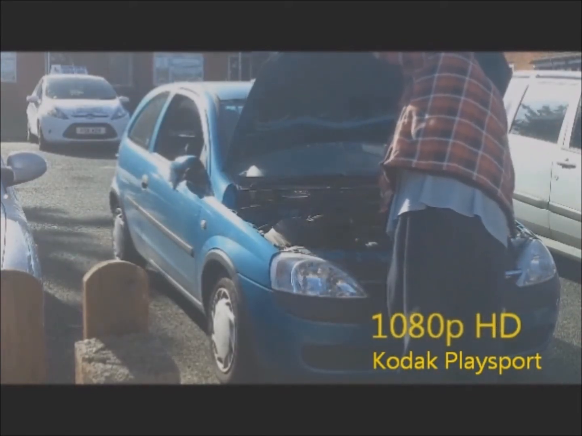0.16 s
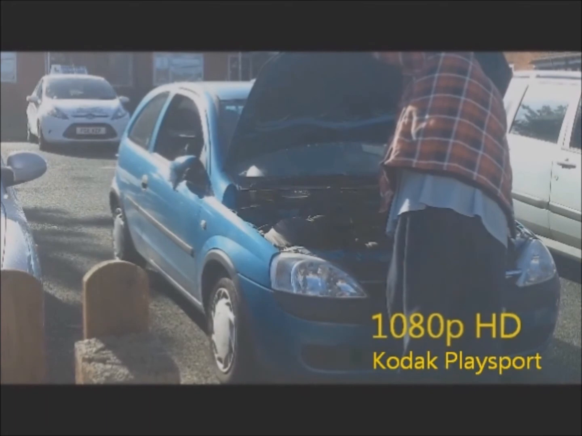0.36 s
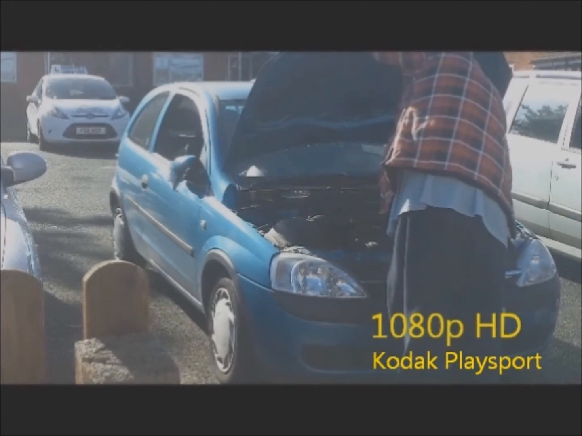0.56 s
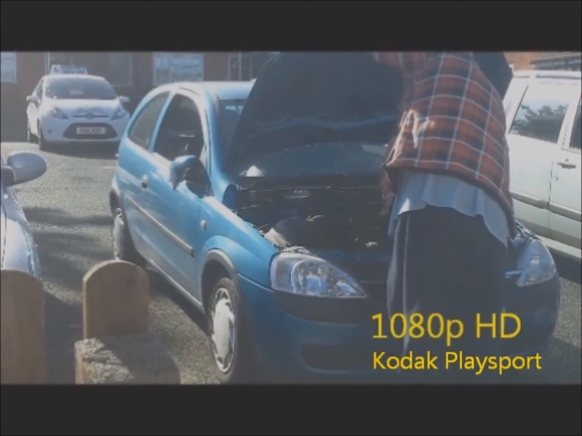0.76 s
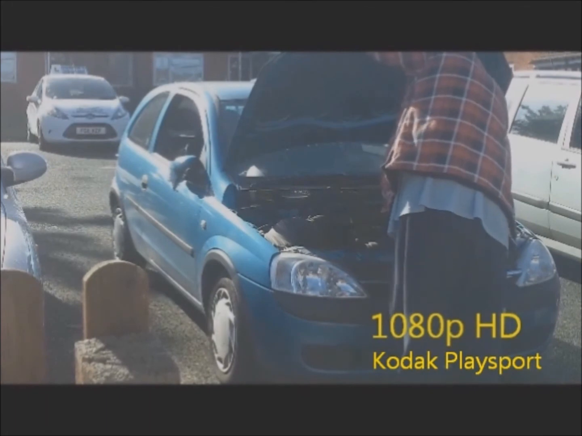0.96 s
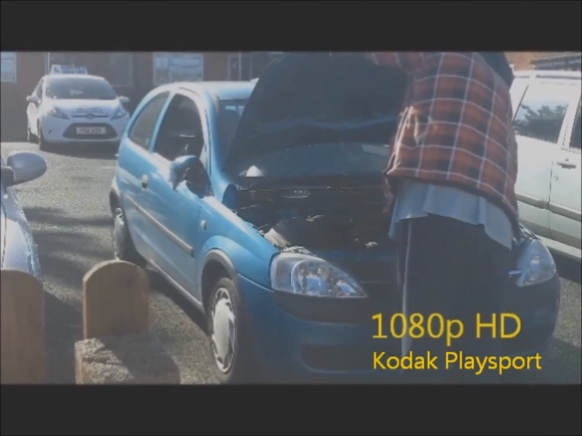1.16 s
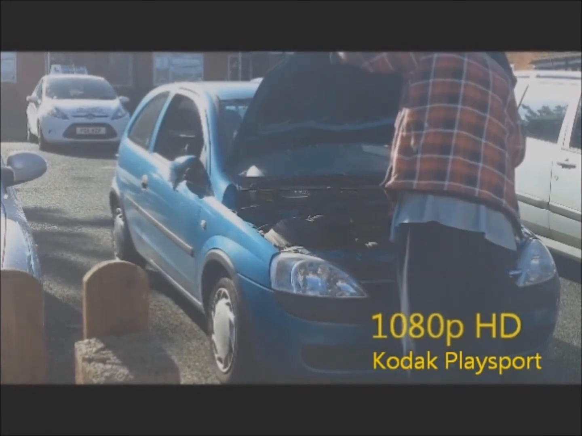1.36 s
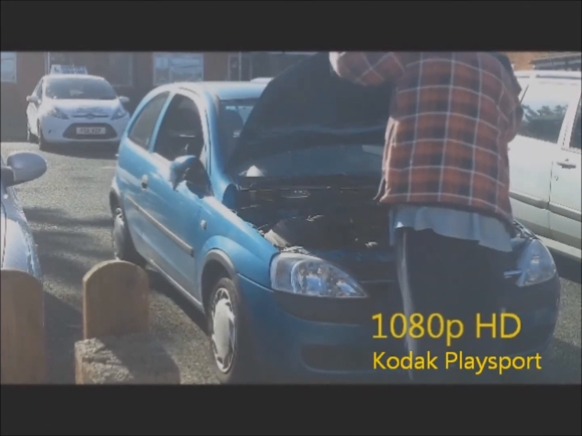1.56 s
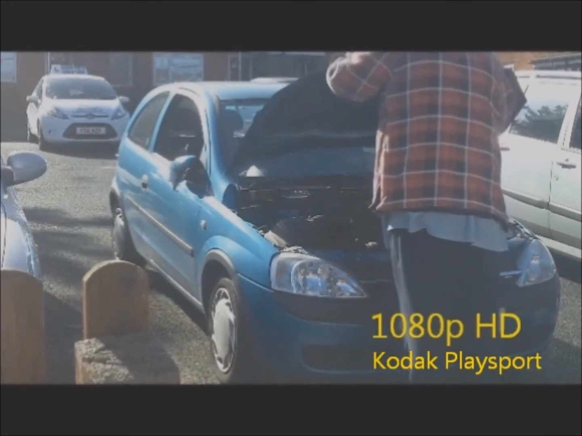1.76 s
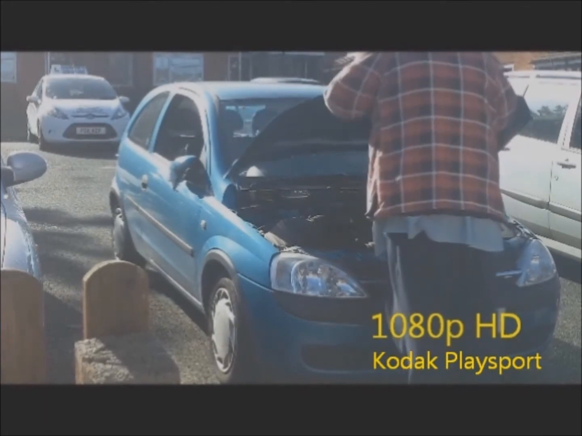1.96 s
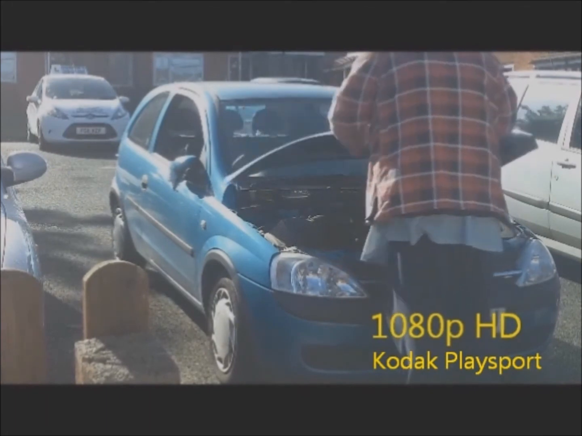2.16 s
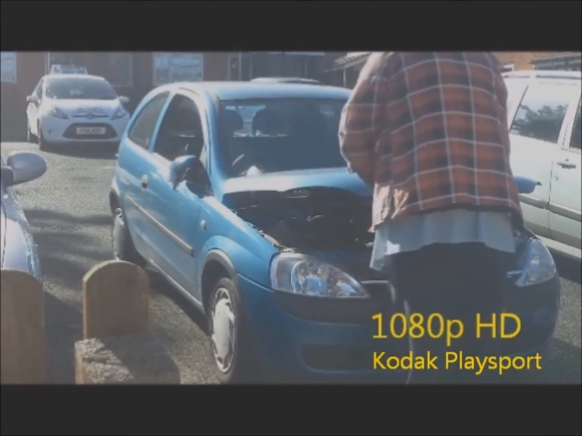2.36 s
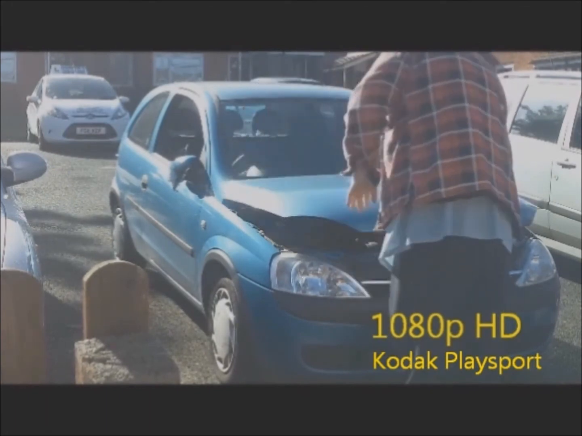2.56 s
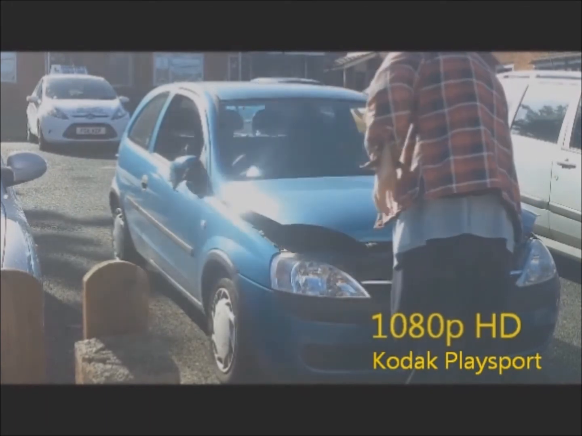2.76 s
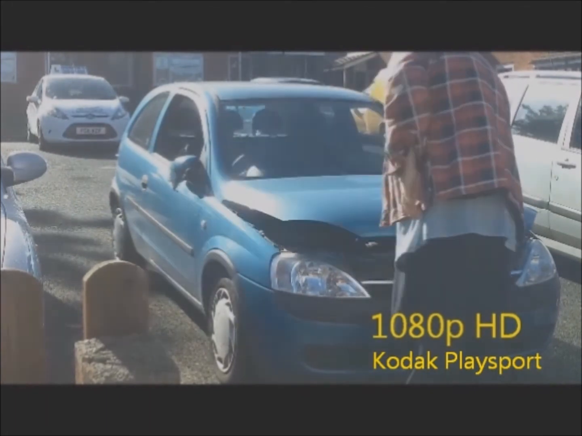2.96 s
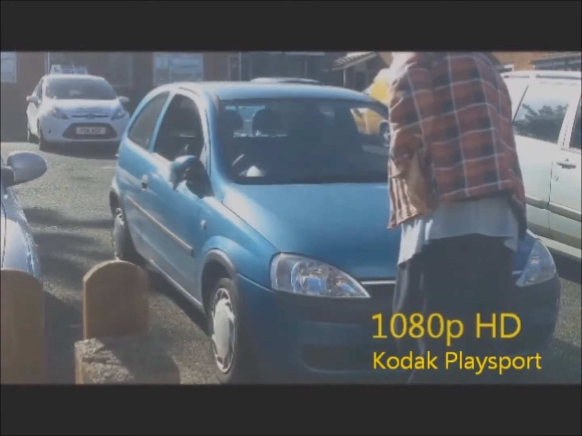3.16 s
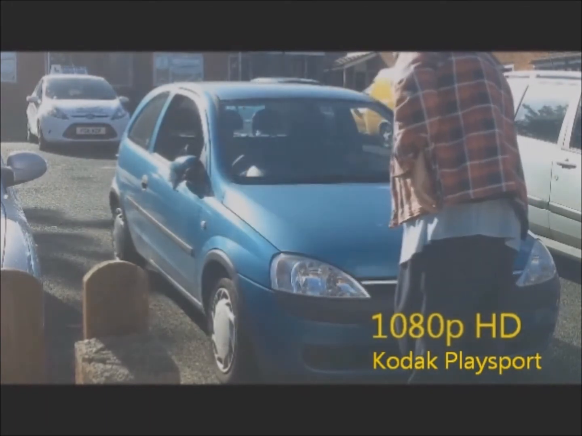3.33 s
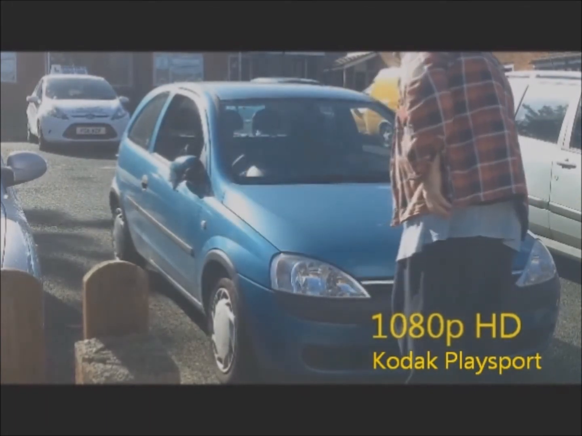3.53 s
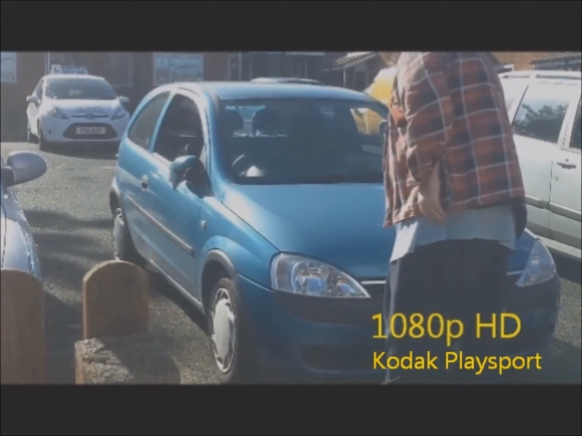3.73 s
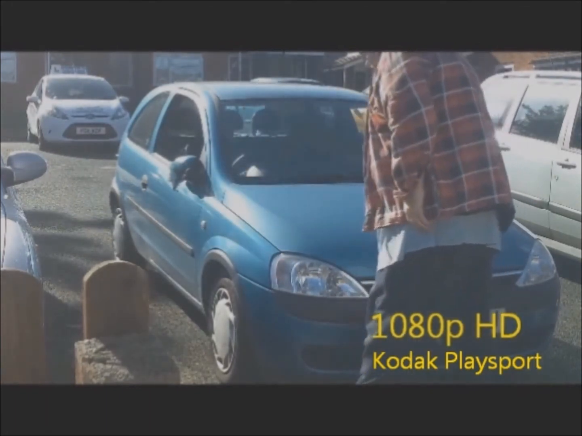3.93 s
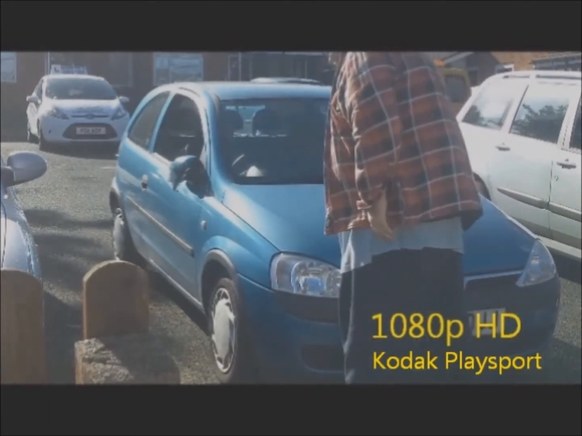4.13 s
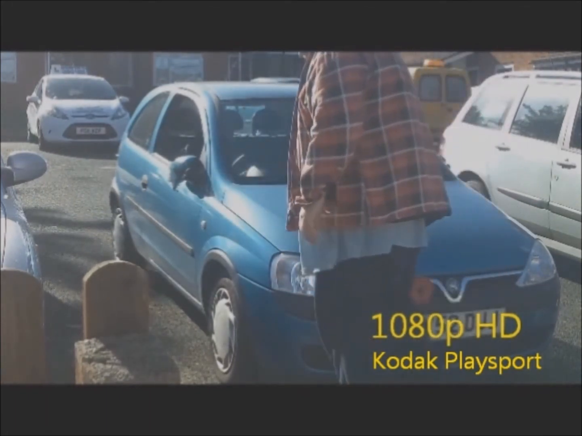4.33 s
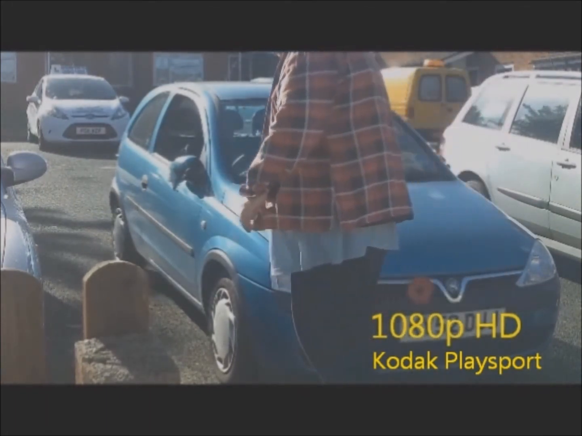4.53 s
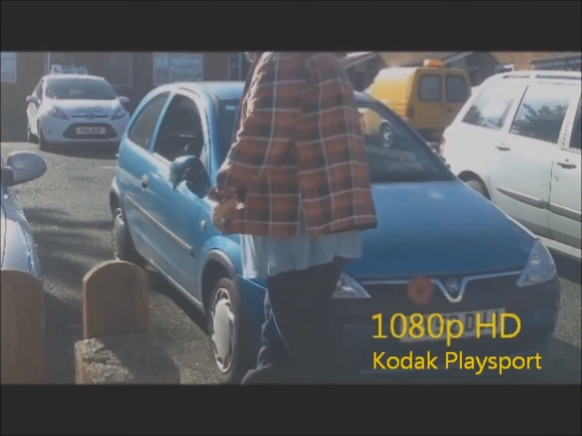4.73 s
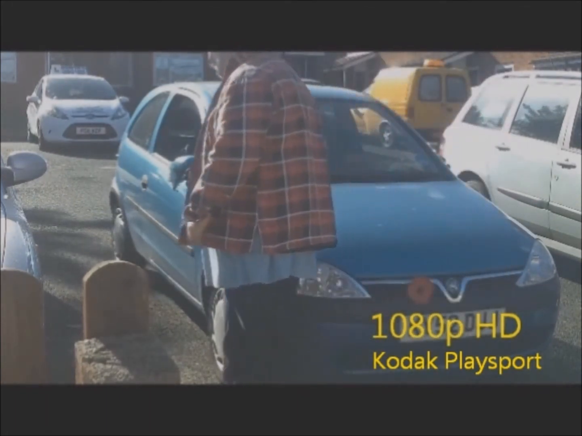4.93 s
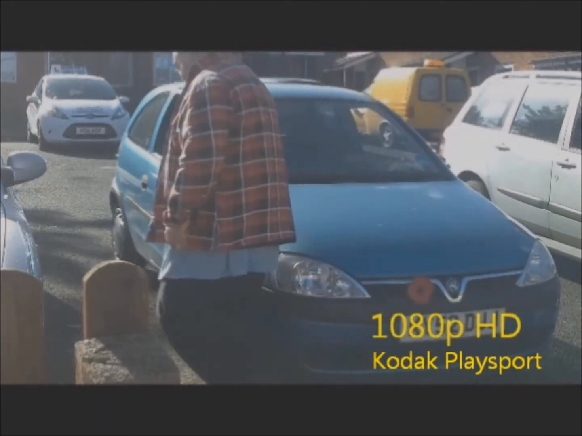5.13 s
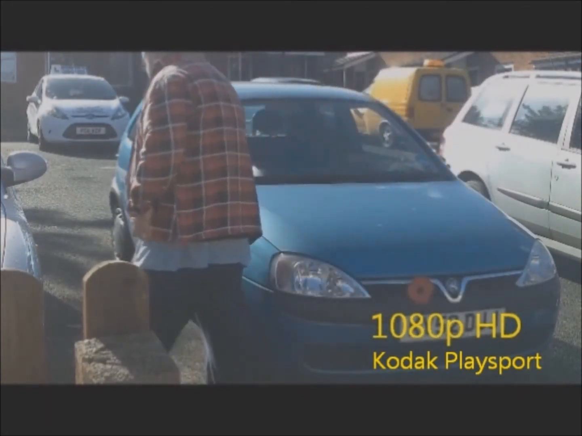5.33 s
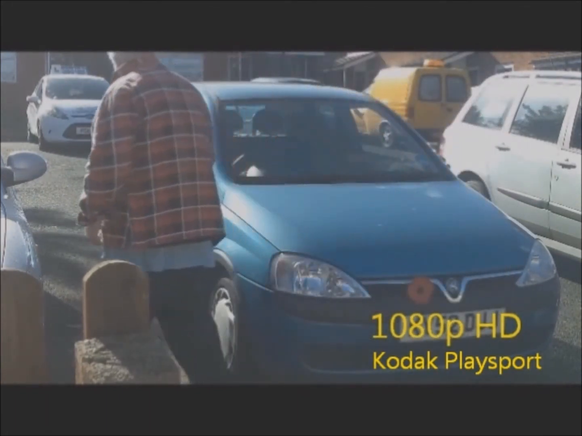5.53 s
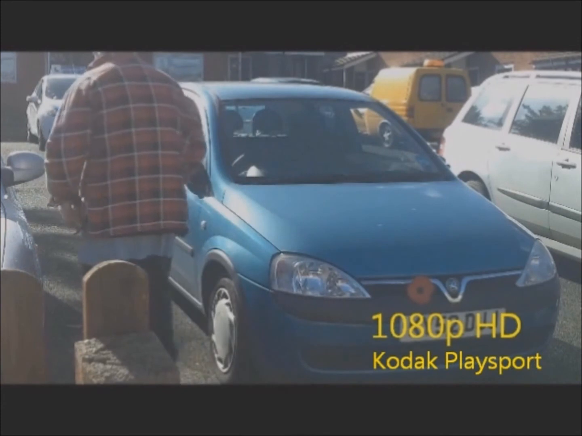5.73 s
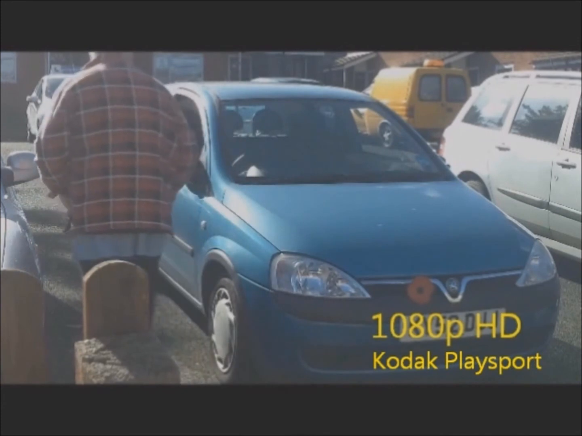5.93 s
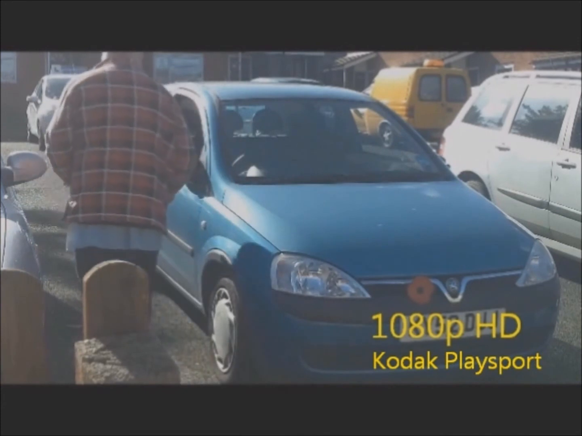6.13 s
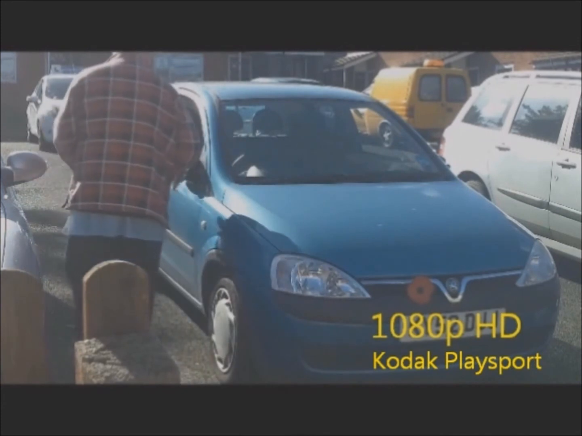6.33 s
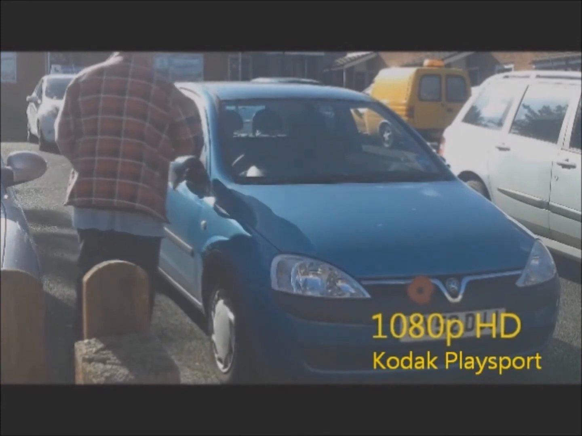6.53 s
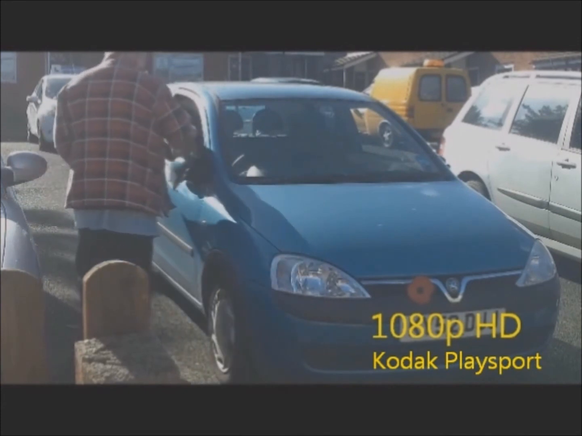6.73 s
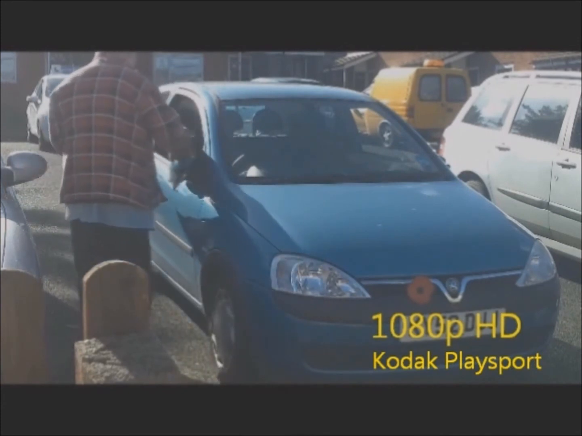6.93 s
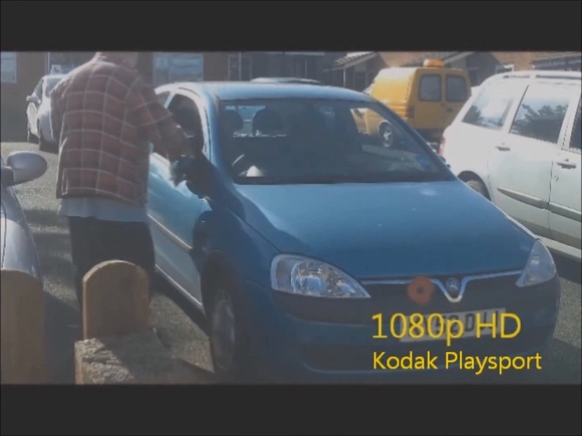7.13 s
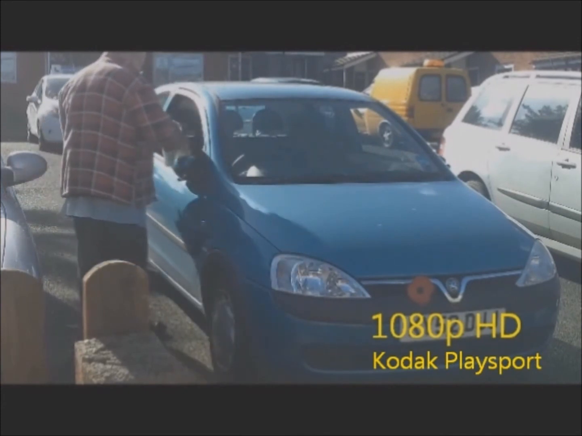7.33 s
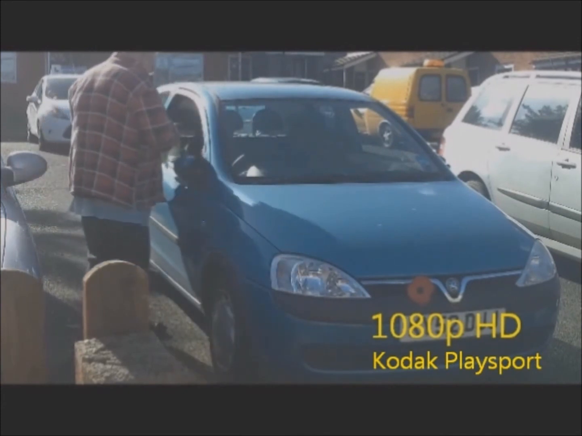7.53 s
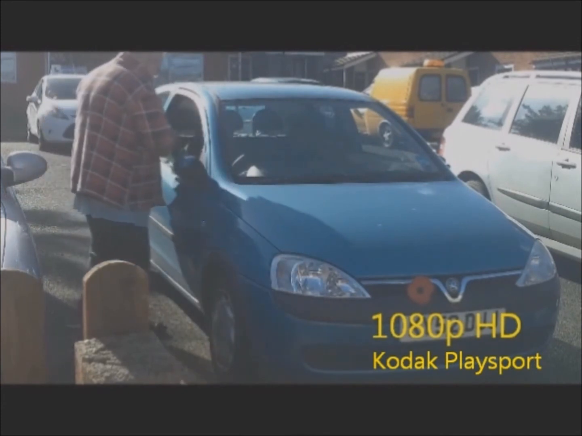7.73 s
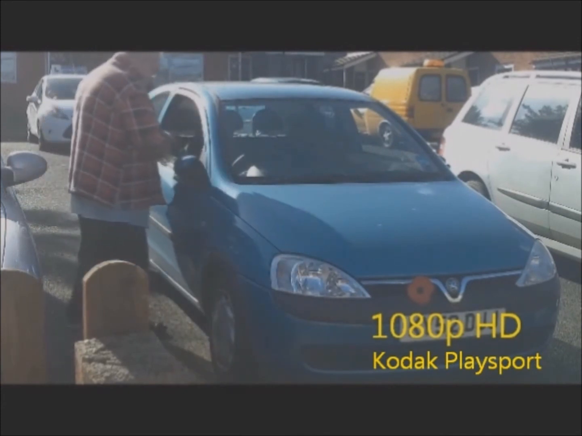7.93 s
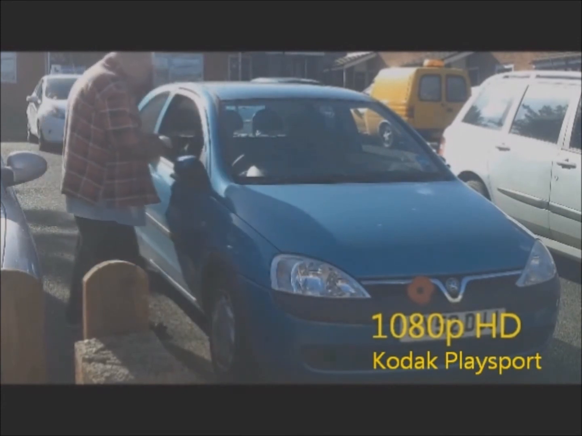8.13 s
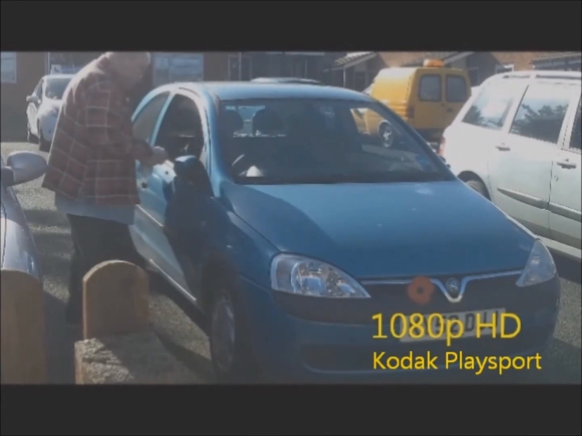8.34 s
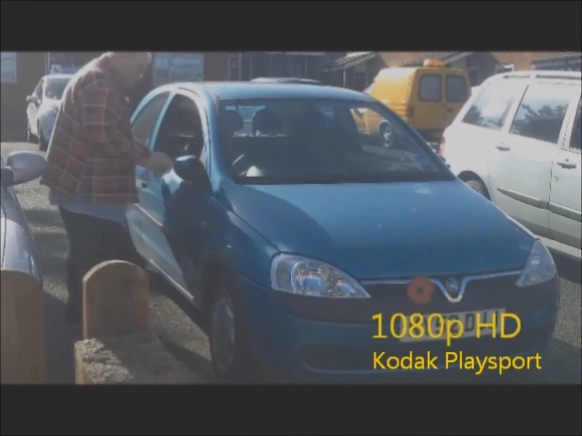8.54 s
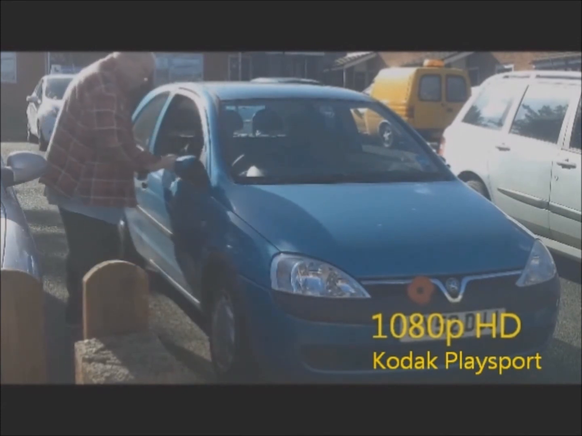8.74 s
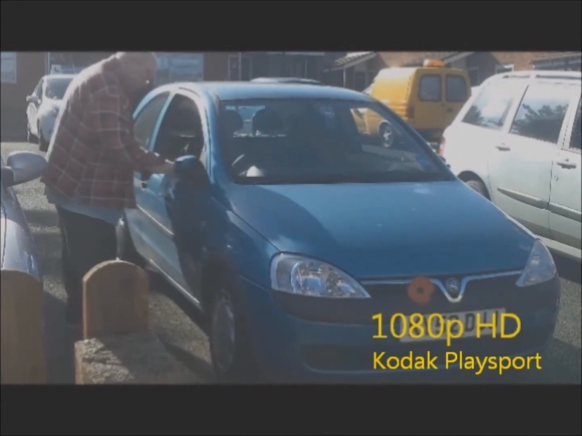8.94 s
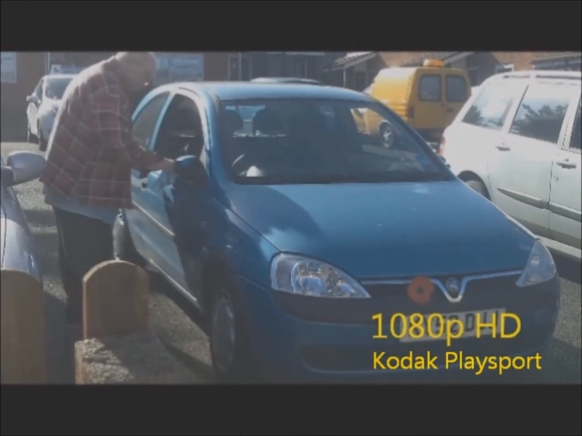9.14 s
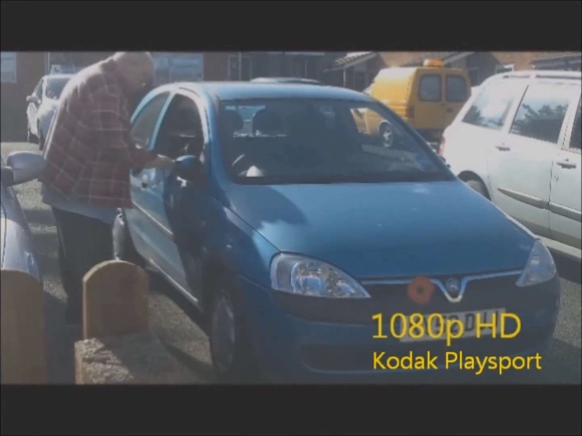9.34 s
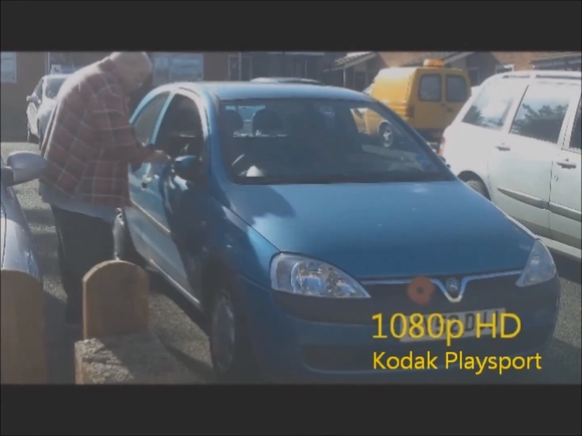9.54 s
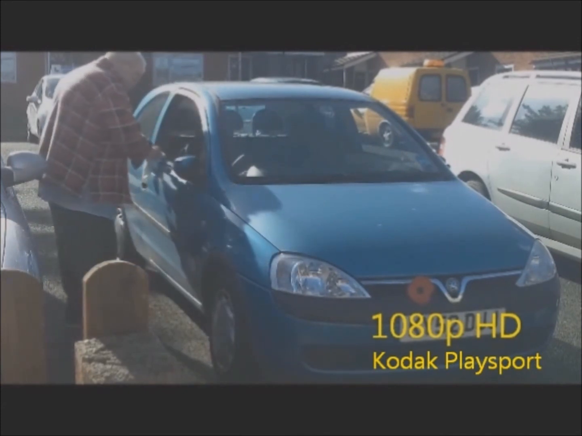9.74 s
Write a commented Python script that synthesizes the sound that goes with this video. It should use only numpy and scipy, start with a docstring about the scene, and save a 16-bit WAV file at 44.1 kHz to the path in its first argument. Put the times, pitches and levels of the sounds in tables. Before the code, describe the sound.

Faint, steady distant traffic hums throughout in an open car park. At about 0.8 seconds a metal prop rod rattles into its holder with a brief ringing clatter. A tiny click follows at 2.3 seconds. At 3.3 seconds the car bonnet slams shut, by far the loudest event: a sharp latch clash and a deep, shuddering steel boom that dies away over about a second, with a short echo off buildings. From 5 to 6.2 seconds come a few soft, dull steps and bumps. Small, bright clicks at the car and its door are scattered between 5.6 and 8.7 seconds, with gritty shoe scuffs around 6.2 and 8.5 seconds. From about 6 seconds wind rumbles on the microphone, growing steadily into low buffeting, with the strongest gusts near 9 and 9.7 seconds. A far bird gives one faint, short chirp at 9.5 seconds.

```python
"""An open car park with distant traffic. A man snaps a bonnet's prop rod into its holder and lets
the bonnet slam: the latch clashes, the steel skin booms, the buildings throw it back. He walks
round to the door with dull steps, gritty scuffs and small clicks. A rising wind buffets the
microphone, and a far bird chirps once."""
import sys
import numpy as np
from scipy import signal
from scipy.fft import rfft, irfft
from scipy.io import wavfile

SR = 44100
rng = np.random.default_rng(int(sys.argv[2]) if len(sys.argv) > 2 else 0)


def master_out(mix):
    """Clip the mix to full scale and print it as 16-bit PCM to the path in sys.argv[1]."""
    frames = np.transpose(np.atleast_2d(mix))
    ceiling = np.clip(frames, -1, 1)
    pcm = np.round(ceiling * 32767).astype(np.int16)
    wavfile.write(sys.argv[1], SR, pcm)


N = 431738

# Far traffic. Each row: frequency in Hz, relative level in dB.
TRAFFIC_SPECTRUM = [(20, 9.5), (40, 12), (72, 13), (110, 6.5), (200, 1), (400, -2), (650, -2.5),
                    (980, -0.7), (1600, -7), (3400, -11.5), (4900, -14), (6500, -28.5), (8000, -39.5),
                    (11000, -33.5), (15000, -37.5)]
TRAFFIC_DB = -45

# Prop rod rattling into its holder. Each row: start in seconds, level in dB, T60 in seconds.
PROP_BLOWS = [(.8215, -26.5, 0.047), (.8268, -26, 0.058), (.8415, -28, 0.056), (.8482, -30, 0.083),
              (.876, -40, .06), (.903, -45, .08), (.918, -44, .09)]
# Rod on holder. Each row: frequency in Hz, relative level in dB.
PROP_SPECTRUM = [(60, -13), (200, -2), (330, -6), (500, 9), (950, -1.5), (2200, 2), (3100, 0.5), (3700, -3),
                 (5200, -4), (6500, -20.5), (7800, -34), (10500, -32), (15000, -44)]
# Rod and front panel. Each row: frequency in Hz, level in dB, T60 in seconds.
ROD_MODES = [(71, -36.5, 0.43), (139, -40.5, 0.68), (242.6, -40.5, 0.36), (473, -33.5, 0.094),
             (550, -51, .09), (2360, -34, 0.092), (3060, -30.5, 0.06)]
# Strikes that ring the rod. Each row: start in seconds, gain in dB, rise in seconds.
ROD_HITS = [(.828, .5, .003), (.847, 2, .002)]
# Lock and bracket. Each row: frequency in Hz, relative level in dB, T60 in seconds.
LOCK_MODES = [(872, -9, .35), (900, -12, .35), (957, -11, .35), (1010, -12, .2), (1340, -13, .3),
              (1600, -14, .12), (2261, -1, .07), (2760, -4, .2), (2836, -6, .18), (3230, -12, .12),
              (3462, -4, .13), (4620, -12, .14), (4963, -15, .1)]
DULLING_DB_PER_DB, DULLING_FULL_HZ = .5, 9000  # treble lost per dB below the hardest blow

# Echo off the buildings. Each row: delay in seconds, relative level in dB.
ECHO_ENVELOPE = [(.01, 11), (.07, -1), (.12, -7), (.2, -3), (.28, -9), (.45, -12.5), (.8, -49)]
# Echo colour. Each row: frequency in Hz, relative level in dB.
ECHO_SPECTRUM = [(40, -26), (150, -8), (350, -0.5), (550, -0.5), (900, 1.5), (1500, 1.5), (3000, -4.5),
                 (5000, -4.5), (7500, -7), (12000, -28)]

# Footfalls and bumps on the car. Each row: start in seconds, level in dB, pitch in Hz, T60 in seconds.
KNOCK_EVENTS = [(.85, -36, 114, 0.23), (.898, -35, 153, 0.18), (5.0587, -30, 254, 0.039),
                (5.068, -35.5, 267, 0.047), (5.585, -37.5, 470, 0.056), (6.16, -42, 320, 0.07),
                (6.186, -37, 567, 0.051)]
# Clicks at car and door. Each row: start in seconds, level in dB, T60 in seconds, resonance in Hz.
CLICK_EVENTS = [(2.317, -38.5, .019, 2920), (5.6491, -36, 0.018, 4600), (6.348, -34, 0.031, 3070),
                (6.876, -49, .04, 3400), (7.094, -42.5, .046, 2900), (7.152, -35.5, 0.031, 4670),
                (7.178, -38.5, 0.031, 4400), (7.506, -38, 0.018, 2900), (7.515, -33, 0.029, 2800),
                (8.623, -39.5, 0.031, 3100), (8.6755, -35, .035, 3100)]
# Grit's broad peak. Each row: multiple of the resonance frequency, relative level in dB.
GRIT_PEAK = [(.125, -36), (.45, -10), (.75, -1.5), (.9, -.5), (1, 2.5), (1.2, -2.5)]
# Grit's treble. Each row: frequency in Hz, relative level in dB.
GRIT_TREBLE_SPECTRUM = [(5100, -5), (6200, -15.5), (6900, -25), (7600, -38), (11000, -33), (15000, -39)]

# Bonnet hitting catch, lock and frame. Each row: start in seconds, level in dB, T60 in seconds.
SLAM_BLOWS = [(3.3248, -12.5, 0.048), (3.3268, -11, 0.046), (3.335, -33, .07), (3.3495, -19, .08),
              (3.3555, -20.5, 0.1), (3.3627, -20, 0.076), (3.3665, -21, 0.067), (3.379, -29, 0.052),
              (3.402, -40, .05), (3.4425, -34, 0.088)]
# Steel on steel. Each row: frequency in Hz, relative level in dB.
SLAM_SPECTRUM = [(60, -13), (200, -10), (600, -7), (1000, 3), (1500, -1), (1950, -5.5), (2300, 1.5),
                 (3600, -1.5), (5000, -2.5), (6200, -18.5), (7500, -28), (10500, -23), (15000, -31.5)]
# Bonnet skin and sprung body. Each row: frequency in Hz, level in dB, T60 in seconds, start in seconds.
PANEL_MODES = [(27.5, -20, 0.82, 3.4), (46, -26, .5, 3.34), (67.9, -18.5, 1.08, 3.345),
               (104.4, -20.5, 1.32, 3.35), (127.5, -13, 0.39, 3.328), (150.6, -13.5, 0.64, 3.42),
               (171, -25, .45, 3.4), (196, -23.5, 0.49, 3.35), (259.7, -24, .75, 3.335),
               (292, -26, .5, 3.43), (318, -27.5, .55, 3.43), (382, -33, 0.56, 3.35),
               (437, -25.5, .55, 3.36), (457, -29.5, 0.55, 3.36), (618, -29, 0.46, 3.35)]
# Rebounds on the rubber stops. Each row: start in seconds, level in dB.
REBOUNDS = [(3.327, -24), (3.35, -17.5), (3.399, -25), (3.443, -23.5), (3.485, -22), (3.52, -27.5),
            (3.595, -29), (3.645, -35.5)]
# Bodywork flutter. Each row: frequency in Hz, relative level in dB.
FLUTTER_SPECTRUM = [(20, -17), (70, -3.5), (140, 3), (220, -3), (320, -5), (480, -10.5), (700, -18),
                    (1200, -25), (3000, -31.5), (8000, -66)]
# Whole-body rumble. Each row: frequency in Hz, relative level in dB.
RUMBLE_SPECTRUM = [(20, -8), (60, -2), (110, 5.5), (200, -10), (400, -32), (1500, -69)]
RUMBLE_START_S, RUMBLE_DB = 3.35, -22.5

# Turbulence at the microphone. Each row: frequency in Hz, relative level in dB.
WIND_SPECTRUM = [(10, -1.5), (25, 4.5), (55, 1.5), (90, -7.5), (150, -18), (250, -32), (450, -51),
                 (1200, -87)]
WIND_START_S, WIND_FADE_IN_S, WIND_BASE_DB, WIND_GROWTH_DB_PER_S = 5.85, 0.66, -46, 4
SURGE_DB, FLAP_OVER_WIND_DB = 3.6, -30.5
# Gusts. Each row: centre in seconds, half width in seconds, boost in dB.
WIND_GUSTS = [(8.7, 0.09, 5), (9.04, .06, 11.5), (9.39, 0.052, 4.5), (9.73, 0.12, 8.5)]
# Strongest eddies. Each row: centre in seconds, peak in dB, half width in seconds.
STRONG_EDDIES = [(6.26, -26, .0026), (6.648, -25, .0029), (7.453, -27, 0.0035), (8.244, -22.5, 0.0077),
                 (8.387, -29, 0.0025), (8.448, -24.5, .0036), (8.936, -25.5, .0012), (8.963, -26, .0017),
                 (8.991, -20.5, .0025), (9.063, -12, 0.0052), (9.068, -23.5, 0.0018), (9.237, -18.5, 0.005),
                 (9.412, -20, .0048), (9.588, -23.5, 0.0017), (9.766, -17, 0.0018)]
EDDIES_PER_S, EDDY_OVER_WIND_DB, EDDY_HALF_WIDTH_S = 5, 1.5, 0.0044  # lesser, random eddies

# Shoe and hand scuffs. Each row: peak time in seconds, level in dB, swell in seconds, T60 in seconds,
# resonance in Hz, treble gain in dB.
SCUFF_EVENTS = [(6.171, -42.5, 0.012, 0.059, 3300, 1), (8.41, -38, .008, 0.076, 2100, -4),
                (8.425, -35, .005, 0.064, 1850, -2), (8.57, -44.5, .004, 0.067, 3320, 0),
                (8.675, -40.5, 0.03, .08, 3150, 1.5)]
# Far bird. One row: start in seconds, length in seconds, start and end pitch in Hz, level in dB.
BIRD_CALL = (9.464, .021, 4350, 5200, -47)


def gain_of(db):
    return 10 ** (np.asarray(db) / 20)


def unit_rms(x):
    return x / np.sqrt(np.mean(x ** 2) + 1e-20)


def seconds(length_s):
    return np.arange(int(length_s * SR)) / SR


def add(mix, start_s, sound):
    part = mix[round(start_s * SR):][:len(sound)]
    part += sound[:len(part)]


def coloured(x, spectrum):
    """Filter to (Hz, dB) points; unit RMS."""
    hz, db = np.transpose(spectrum)
    bins_hz = np.fft.rfftfreq(len(x), 1 / SR)
    shape = gain_of(np.interp(np.log(bins_hz + 1), np.log(hz), db))
    return unit_rms(irfft(rfft(x) * shape, len(x)))


def noise(spectrum, size):
    return coloured(rng.standard_normal(size), spectrum)


def fade(t, t60_s, rise_s):
    """Swell, then exponential decay."""
    return (1 - np.exp(-t / rise_s)) * np.exp(-np.log(1000) * t / t60_s)


def ring(modes, t, rise_s):
    """Damped modes; neighbours swing in antiphase."""
    return sum((-1) ** k * gain_of(db) * fade(t, t60_s, rise_s) * np.sin(2 * np.pi * hz * t)
               for k, (hz, db, t60_s) in enumerate(modes))


def traffic():
    """Steady far roar with slight level drift."""
    drift_db = 0.089 * noise([(1, -12), (5, 20), (15, -48), (60, -90)], N)
    return gain_of(TRAFFIC_DB + drift_db) * noise(TRAFFIC_SPECTRUM, N)


def clashes(blows, spectrum, lock_db):
    """Each blow shakes dense, short-lived steel modes and rings the lock; softer blows are duller."""
    out, t = np.zeros(N), seconds(1)
    lock = gain_of(lock_db) * ring(LOCK_MODES, t, rise_s=0.00037)
    hardest_db = max(db for _, db, _ in blows)
    for start_s, db, t60_s in blows:
        loss_db = DULLING_DB_PER_DB * (hardest_db - db)
        dulled = [(hz, band_db - loss_db * min(hz / DULLING_FULL_HZ, 1) ** 2)
                  for hz, band_db in spectrum]
        steel = noise(dulled, len(t)) * fade(t, t60_s, rise_s=0.00043)
        add(out, start_s, gain_of(db) * (steel + lock))
    return out


def prop_rod():
    """The rod rattles home; two strikes ring it and the panel that holds it."""
    out = clashes(PROP_BLOWS, PROP_SPECTRUM, lock_db=-25)
    for start_s, db, rise_s in ROD_HITS:
        add(out, start_s, gain_of(db) * ring(ROD_MODES, seconds(1), rise_s))
    return out


def building_echo(x):
    """Scattered reflections: strongest early, with a second swell from the far buildings."""
    t = seconds(0.725)
    envelope = gain_of(np.interp(t, *np.transpose(ECHO_ENVELOPE)))
    tail = noise(ECHO_SPECTRUM, len(t)) * envelope
    return gain_of(-16.5) * signal.fftconvolve(x, tail / np.linalg.norm(tail))[:N]


def knocks():
    """Soft blows of foot and body: one damped pitch plus a dull puff."""
    out, t = np.zeros(N), seconds(0.6)
    for start_s, db, hz, t60_s in KNOCK_EVENTS:
        puff = noise([(hz / 2, -8), (hz, 0), (hz * 2, -7), (hz * 10, -45)], len(t))
        tone = np.sin(2 * np.pi * hz * t)
        add(out, start_s, gain_of(db) * (tone + .5 * puff) * fade(t, t60_s, rise_s=0.00059))
    return out


def grit(resonance_hz, size, spread_db, treble_db):
    """Dense grains of uneven size through one broad resonance."""
    grains = rng.standard_normal(size) * gain_of(spread_db * rng.standard_normal(size))
    peak = [(resonance_hz * ratio, db) for ratio, db in GRIT_PEAK]
    treble = [(hz, db + treble_db) for hz, db in GRIT_TREBLE_SPECTRUM]
    return coloured(grains, sorted(peak + treble))


def clicks():
    """Short bright bursts of grit, each with a faint, brief ring."""
    out, t = np.zeros(N), seconds(0.55)
    for start_s, db, t60_s, hz in CLICK_EVENTS:
        burst = grit(hz, len(t), spread_db=1.3, treble_db=-1.5) * fade(t, t60_s, rise_s=0.00033)
        ping = ring([(hz, -6, 0.51 * t60_s)], t, rise_s=0.0005)
        add(out, start_s, gain_of(db) * (burst + ping))
    return out


def bonnet_slam():
    """The catch clashes; the skin booms mode by mode and shudders at each rebound; the body rumbles."""
    out, t = clashes(SLAM_BLOWS, SLAM_SPECTRUM, lock_db=-14.5), seconds(1.1)
    for hz, db, t60_s, start_s in PANEL_MODES:
        add(out, start_s, ring([(hz, db, t60_s)], t, rise_s=0.024))
    for start_s, db in REBOUNDS:
        shudder = noise(FLUTTER_SPECTRUM, len(t)) * fade(t, t60_s=0.36, rise_s=0.0029)
        add(out, start_s, gain_of(db) * shudder)
    rumble = noise(RUMBLE_SPECTRUM, len(t)) * fade(t, t60_s=1.33, rise_s=0.1)
    add(out, RUMBLE_START_S, gain_of(RUMBLE_DB) * rumble)
    return out


def wind():
    """Surging turbulence that grows steadily; gusts make it louder and brighter."""
    t = np.arange(N) / SR
    since_s = t - WIND_START_S
    gust_db = sum(db * np.exp(-((t - centre_s) / half_width_s) ** 2)
                  for centre_s, half_width_s, db in WIND_GUSTS)
    fade_in = np.clip(since_s / WIND_FADE_IN_S, 0, 1)
    strength = fade_in * gain_of(WIND_BASE_DB + WIND_GROWTH_DB_PER_S * since_s + gust_db)
    wander = noise([(1.5, -26), (5, 2), (11, 2), (25, -18), (90, -90)], N)
    surge = gain_of(SURGE_DB * np.minimum(wander, 1))  # capped peaks, deep lulls
    buffet = noise(WIND_SPECTRUM, N)
    flap = noise([(60, -14), (150, 1.5), (300, 4), (450, -8.5), (900, -45), (2000, -76)], N)
    turbulence = buffet + gain_of(FLAP_OVER_WIND_DB + gust_db) * flap
    fade_out = np.clip((t[-1] - t) / 0.0025, 0, 1)
    return (strength * surge * turbulence + eddies(strength)) * fade_out


def eddy(t, half_width_s):
    """One swirl passing the microphone: push, then suction; unit peak."""
    u = t / half_width_s
    return -16 / np.sqrt(27) * u / (1 + u * u) ** 2


def eddies(wind_strength):
    """Strong swirls at set times, plus random lesser ones that grow with the wind."""
    out, t = np.zeros(N), seconds(1) - .5
    for centre_s, db, half_width_s in STRONG_EDDIES:
        add(out, centre_s - .5, gain_of(db) * eddy(t, half_width_s))
    count = int((N / SR - WIND_START_S) * EDDIES_PER_S)
    for slot, (offset, size, breadth) in enumerate(rng.random((count, 3))):
        centre_s = WIND_START_S + (slot + offset) / EDDIES_PER_S
        strength = wind_strength[min(int(centre_s * SR), N - 1)]
        peak = strength * gain_of(EDDY_OVER_WIND_DB + 7 * (size - .5))
        add(out, centre_s - .5, peak * eddy(t, EDDY_HALF_WIDTH_S * (.5 + breadth)))
    return out


def scuffs():
    """Grit catches in clumps as pressure builds, then lets go quickly."""
    out, t = np.zeros(N), seconds(1) - .5
    for peak_s, db, swell_s, t60_s, hz, treble_db in SCUFF_EVENTS:
        pressure = np.exp(np.minimum(t / swell_s, -np.log(1000) * t / t60_s))
        clumps = gain_of(2.2 * noise([(10, -20), (70, 3), (200, -8), (900, -50)], len(t)))
        grains = grit(hz, len(t), spread_db=7, treble_db=treble_db)
        add(out, peak_s - .5, gain_of(db) * pressure * unit_rms(clumps * grains))
    return out


def bird():
    """One short rising whistle."""
    start_s, length_s, start_hz, end_hz, db = BIRD_CALL
    out, t = np.zeros(N), seconds(length_s)
    whistle = signal.chirp(t, start_hz, length_s, end_hz) * np.hanning(len(t))
    add(out, start_s, gain_of(db) * whistle)
    return out


def scene():
    """Car, man and bird with their echo, over traffic and wind; mono."""
    events = bonnet_slam() + prop_rod() + clicks() + scuffs() + knocks() + bird()
    return (events + building_echo(events) + traffic() + wind())[None]


def record(dry):
    """Microphone response: narrow treble dips and a steep band limit."""
    for hz, width_hz in [(4210, 520), (7950, 600), (8780, 450), (12620, 1000)]:
        dry = signal.lfilter(*signal.iirnotch(hz, hz / width_hz, fs=SR), dry)
    lowpass = signal.firwin(801, cutoff=15300, window=("kaiser", 9), fs=SR)
    return signal.oaconvolve(dry, lowpass[None], "same")


dry = scene()
out = record(dry)
master_out(out)
```